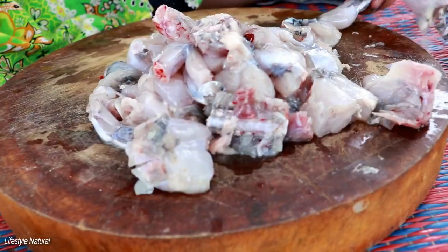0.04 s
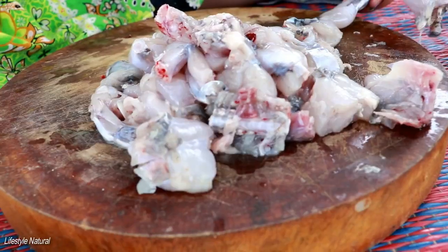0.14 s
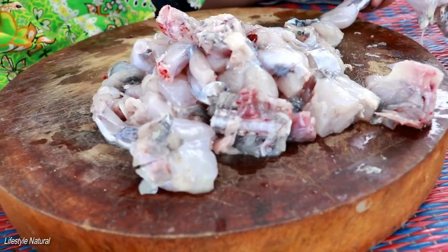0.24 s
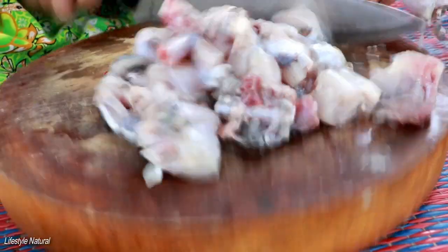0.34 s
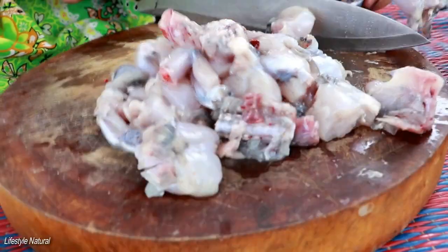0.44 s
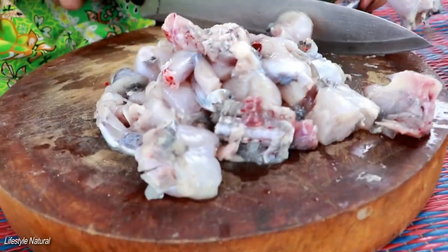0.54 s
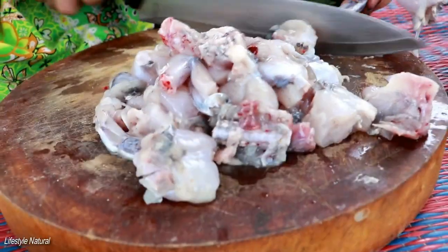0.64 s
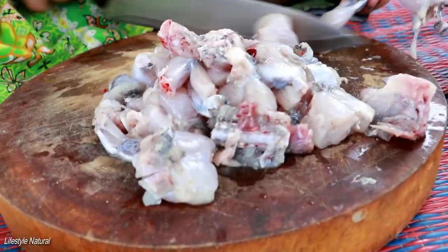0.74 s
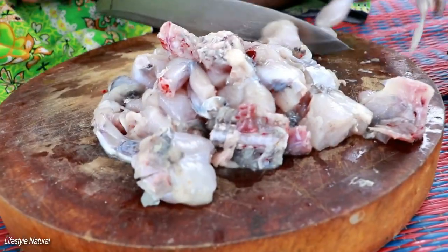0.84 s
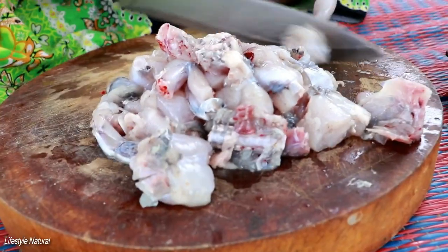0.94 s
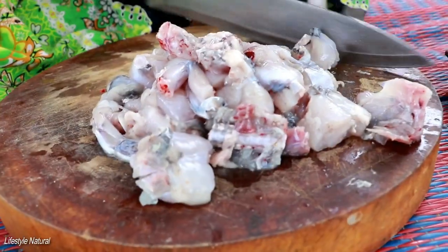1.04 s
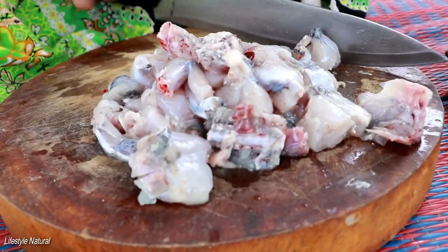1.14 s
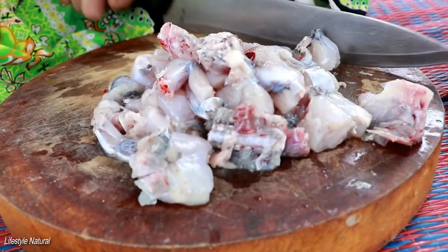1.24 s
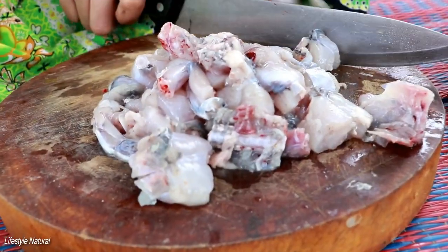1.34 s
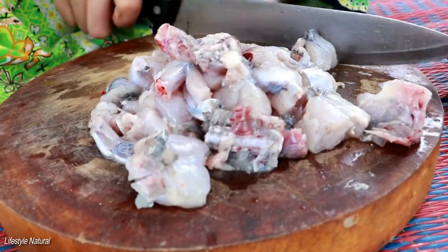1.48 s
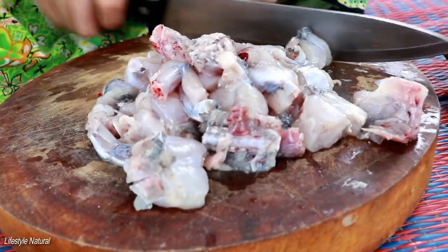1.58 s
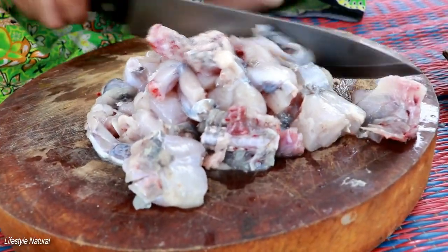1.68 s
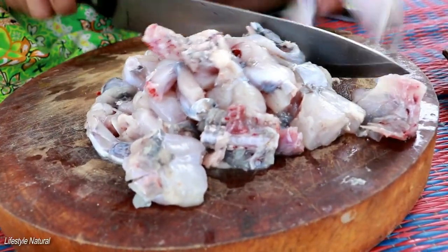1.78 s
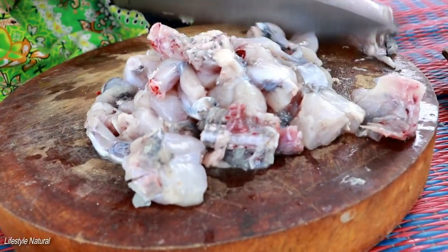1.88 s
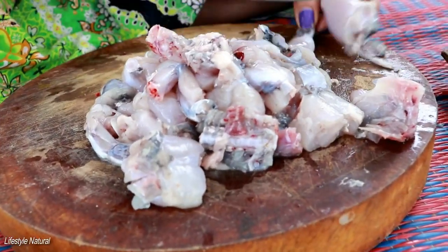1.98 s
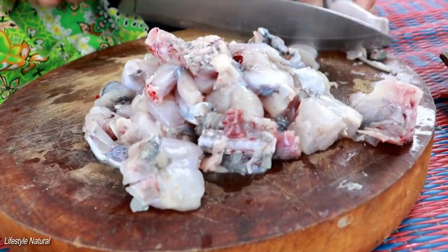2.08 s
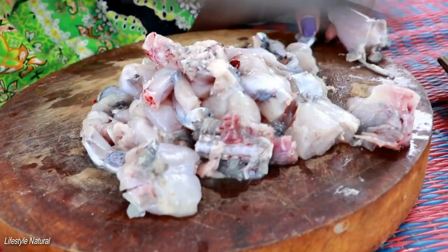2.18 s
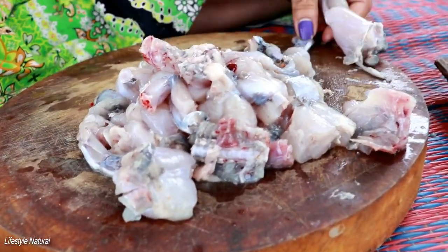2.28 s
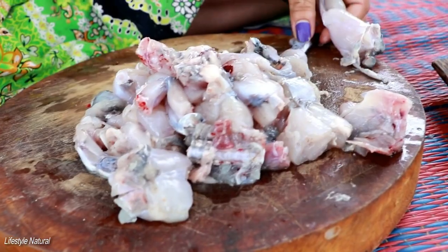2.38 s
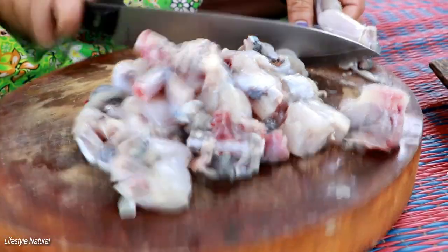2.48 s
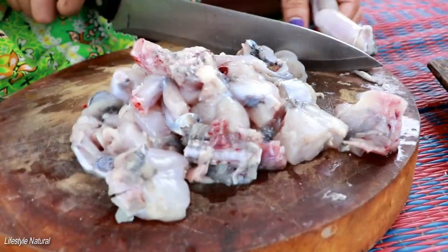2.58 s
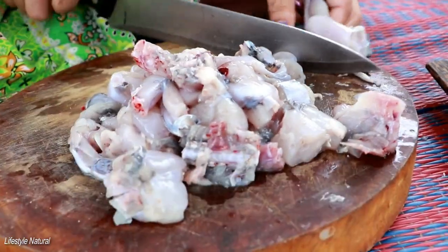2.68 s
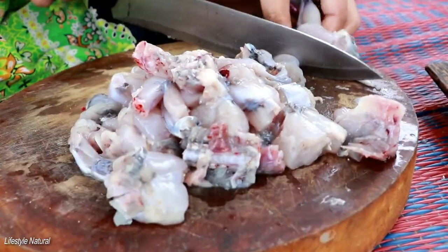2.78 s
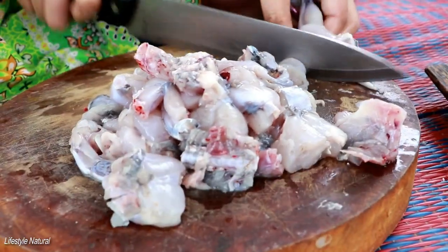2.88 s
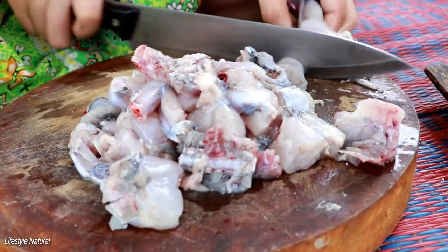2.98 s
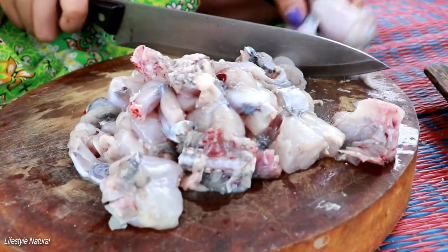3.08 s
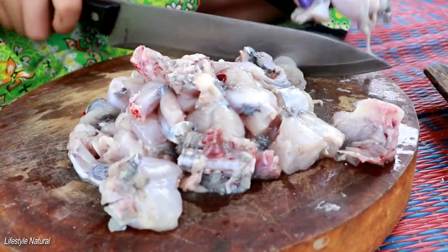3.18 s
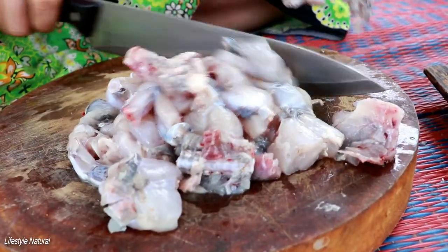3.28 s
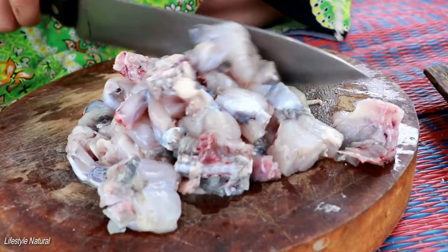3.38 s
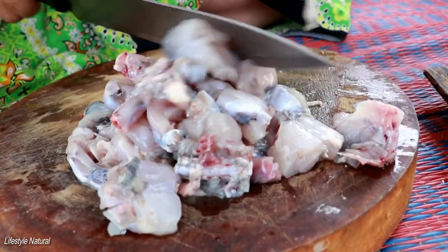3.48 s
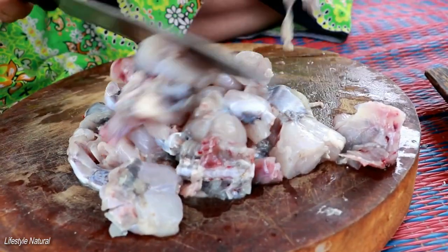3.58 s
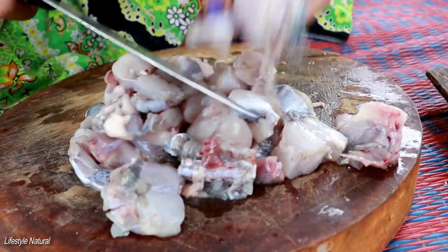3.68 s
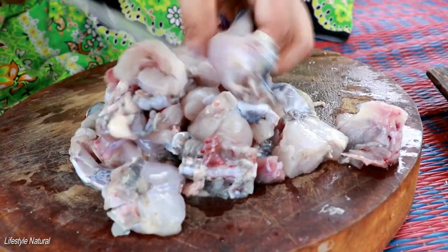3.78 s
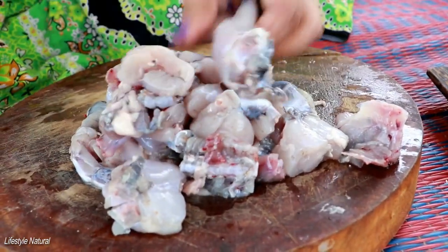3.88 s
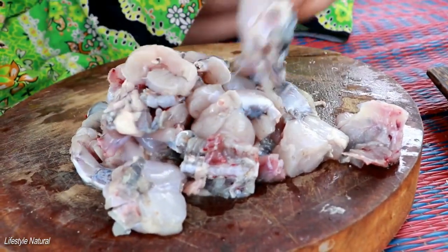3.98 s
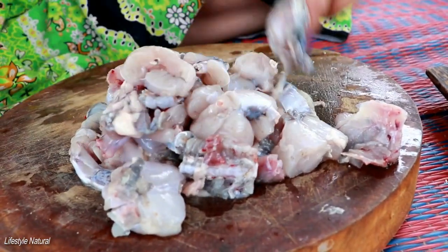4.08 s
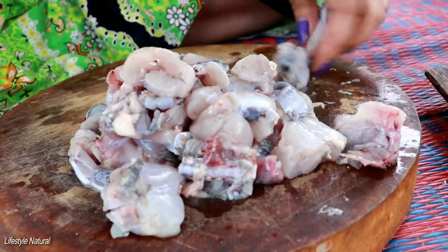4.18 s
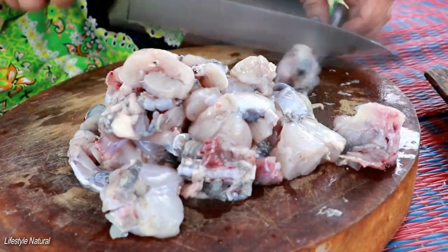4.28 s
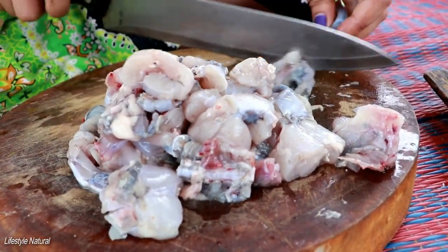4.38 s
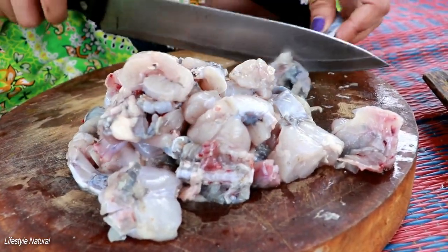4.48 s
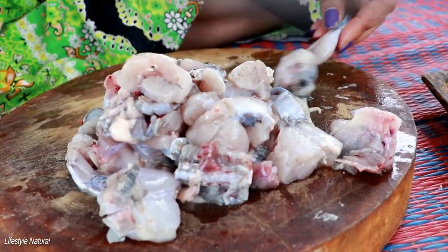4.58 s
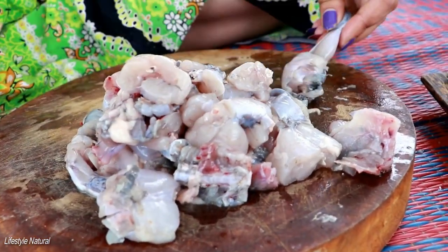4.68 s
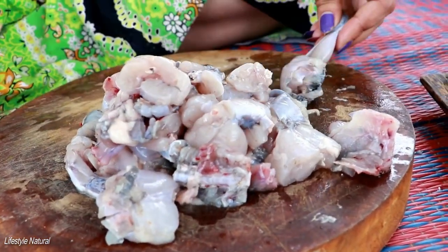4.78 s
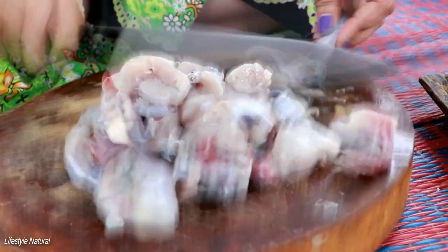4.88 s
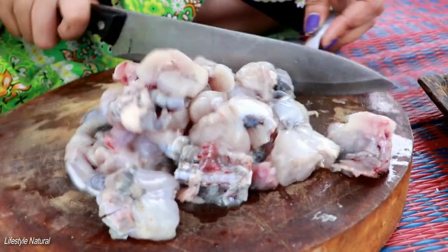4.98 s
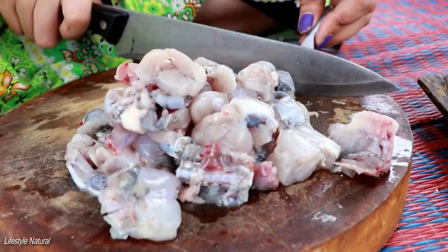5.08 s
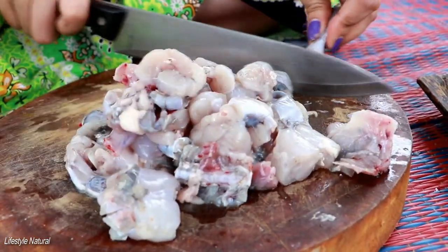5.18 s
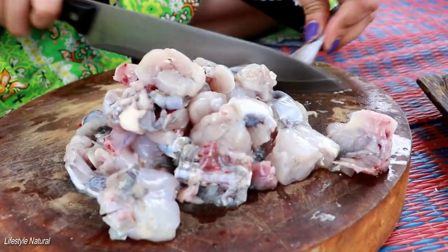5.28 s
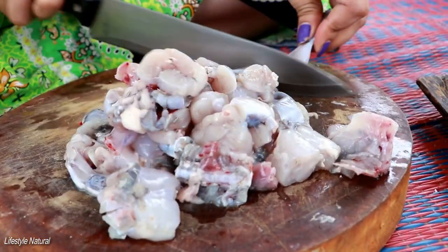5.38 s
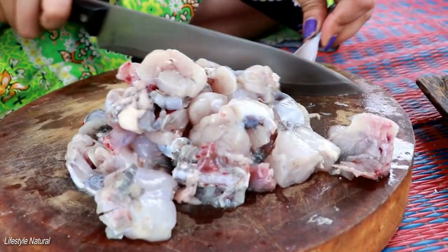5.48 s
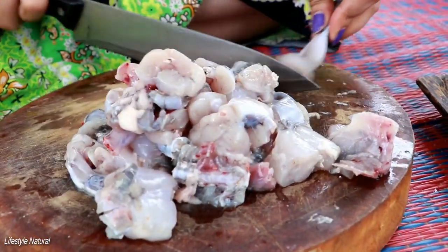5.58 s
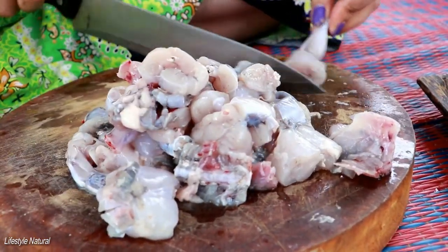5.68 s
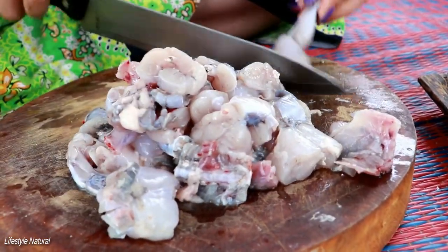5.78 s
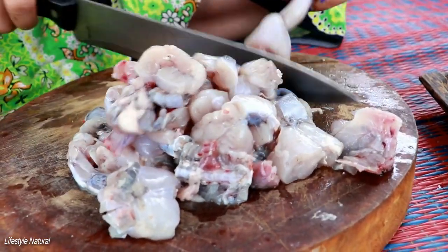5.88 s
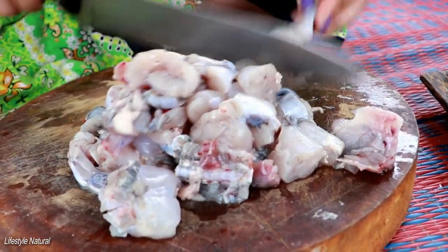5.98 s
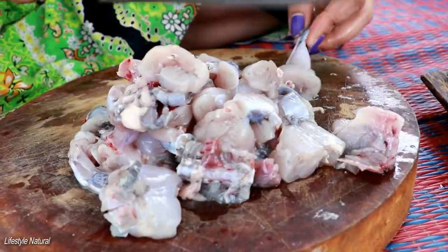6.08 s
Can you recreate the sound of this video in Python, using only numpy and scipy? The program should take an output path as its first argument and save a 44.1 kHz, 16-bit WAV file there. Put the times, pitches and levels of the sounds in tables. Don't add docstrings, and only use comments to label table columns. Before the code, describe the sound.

An outdoor spot with soft air hiss, low rumble and a distant motor droning throughout, quiet beneath a very close chopping board. Tiny bird notes chirp at the start. At 0.4 s a heavy knife slices flesh and cracks bone, the thick board and blade ringing briefly, with wet spatter and three quick bounces; the blow distorts. Another bird note comes at 0.65 s, a faint scrape near 0.8, small wet ticks from 1.05, and a quick birdsong burst around 1.45-1.6. A duller tick falls at 2.15. A cricket starts at 2.4, chop two snaps at 2.5 with two later bounces, and chirping continues to about 3.65, with scrapes near 2.95. The breeze dips around 3.9. Chop three hits at 4.95, woodier, with six clattering bounces, the last heavy. Wet ticks and longer soft scrapes finish by 6 s.

```python
import sys
import numpy as np
from scipy import signal
from scipy.fft import rfft, irfft
from scipy.io import wavfile
from scipy.ndimage import uniform_filter1d

SR = 44100
rng = np.random.default_rng(int(sys.argv[2]) if len(sys.argv) > 2 else 0)


def voltage_ratio(decibels):
    exponent = np.asarray(decibels, float) / 20
    return 10 ** exponent


def output_pcm(signal):
    pcm = np.clip(np.atleast_2d(signal).T, -1, 1) * 32767
    wavfile.write(sys.argv[1], SR, np.round(pcm).astype(np.int16))


N = 270774

# frequency in Hz, level in dB per Hz.
CRACK_SPECTRA = [
    [(1060, -45), (2400, -10), (3860, 2.5), (6340, -13.5), (7930, -6.5), (10900, -26), (13700, -9),
     (15400, -22)],
    [(1060, -49), (1800, -9.5), (3630, 4), (4540, -29.5), (5540, 1.5), (7580, -10.5), (12400, -18),
     (15400, -33)],
    [(1060, -38), (1800, -12), (3660, -4), (4190, -12.5), (5640, -7), (6340, -7.5), (9840, -14.5),
     (15400, -31.5)],
]


def evened(x):
    return x / np.sqrt(np.mean(x ** 2) + 1e-20)


def read(points, hz):
    f, value = np.transpose(points)
    return np.interp(np.log(hz + 1), np.log(f + 1), value)


def add(mix, s, sound):
    part = mix[round(s * SR):][:len(sound)]
    part += sound[:len(part)]


def coloured(points, size):
    hz = np.fft.rfftfreq(size, 1 / SR)
    spectrum = rfft(rng.standard_normal(size)) * voltage_ratio(read(points, hz))
    return evened(irfft(spectrum, size))


def resonate(x, hz, width):
    r = np.exp(-np.pi * width / SR)
    return signal.lfilter([1, 0, -1], [1, -2 * r * np.cos(2 * np.pi * hz / SR), r * r], x)


def resonate_twice(x, hz, width):
    return resonate(resonate(x, hz, width), hz, 2 * width)


def open_air():
    # frequency in Hz, level in dB per Hz.
    air_spectrum = [(20, -15.5), (40, -14.5), (70, -14), (100, -6.5), (273, -8.5), (464, -18), (855, -22),
                    (1400, -26), (2460, -30), (3500, -32), (6000, -37), (10000, -44.5), (15400, -53.5)]
    rumble_rise_db_per_s, gust_db, gust_period_s = 0.4, 0.3, 1.85
    lull_s, lull_length_s, lull_db = 3.9, 0.77, -3
    frames, hz = N // 512 + 5, np.fft.rfftfreq(2048, 1 / SR)
    real, imag, patches = rng.standard_normal((frames, 1025, 3)).T
    patches = evened(uniform_filter1d(uniform_filter1d(patches, 14, 0), 8, 1))
    t = np.arange(frames) * 512 / SR
    low = (1 / (1 + (hz / 500) ** 2))[:, None]
    gust = gust_db * np.cos(2 * np.pi * t / gust_period_s)
    lull_depth_db = lull_db / (1 + (hz[:, None] / 3500) ** 2)
    lull = lull_depth_db * np.exp(-((t - lull_s) / lull_length_s) ** 2)
    swell_db = low * rumble_rise_db_per_s * (t - t.mean()) + (1 - low) * (gust + lull)
    level_db = read(air_spectrum, hz)[:, None] + 1.2 * patches + swell_db
    wash = signal.istft((real + 1j * imag) * voltage_ratio(level_db), nperseg=2048, noverlap=1536)[1][:N]
    return voltage_ratio(-45.5) * evened(wash)


def far_motor():
    # frequency in Hz, width in Hz, rms level in dB.
    motor_lines = [(52.2, 19, -56.5), (96.9, 12.6, -48), (119.2, 5.9, -56), (147.6, 14, -62.5),
                   (191.45, 3.2, -55), (265.3, 33, -58), (682, 66, -64.5), (1065, 62, -62.5),
                   (1804, 280, -65.5), (3600, 690, -67.5)]
    out = np.zeros(N)
    for hz, width_hz, db in motor_lines:
        out += voltage_ratio(db) * evened(resonate_twice(rng.standard_normal(N), hz, width_hz))
    return out


def birds():
    # start in seconds, length in seconds, start pitch in Hz, end pitch in Hz, rms level in dB.
    bird_notes = [(0.019, 0.026, 3820, 4020, -58), (0.037, .016, 3720, 3600, -60),
                  (0.064, .018, 4160, 3800, -60), (.63, 0.032, 2780, 2770, -57),
                  (0.671, .05, 2780, 2760, -65), (1.44, 0.05, 3110, 3060, -61),
                  (1.453, .03, 3900, 4030, -67), (1.53, 0.055, 3400, 3300, -60),
                  (1.472, .008, 3300, 2300, -56), (1.482, 0.014, 3226, 3150, -52),
                  (1.498, 0.029, 3940, 4360, -56), (1.52, 0.043, 4100, 4000, -55),
                  (1.56, 0.0177, 3550, 1700, -51), (1.567, 0.016, 4460, 3740, -55),
                  (1.577, 0.0074, 3350, 2720, -50), (1.583, 0.0094, 2090, 2800, -58),
                  (3.047, .03, 3970, 3950, -61)]
    out = np.zeros(N)
    for s, length_s, start_hz, end_hz, db in bird_notes:
        u = np.arange(0, length_s, 1 / SR) / length_s
        flutter = evened(uniform_filter1d(rng.standard_normal(len(u)), 100))
        turns = np.cumsum(start_hz * (end_hz / start_hz) ** u) / SR
        add(out, s, voltage_ratio(db + 4 + 2.3 * flutter) * np.sin(2 * np.pi * turns) * np.sin(np.pi * u))
    return out


def cricket():
    chirp_starts = [
        2.428,
        2.688,
        2.908,
        3.116,
        3.333,
        3.553,
    ]
    # pulse period in seconds, pitch in Hz, width in Hz, pulse t60 in seconds.
    wing = (.036, 4760, 420, .09)
    period_s, hz, width_hz, t60_s = wing
    t = np.arange(2400) / SR
    envelope = voltage_ratio(-57.5 - 60 * t / t60_s) * np.minimum(t / 0.0023, 1)
    out = np.zeros(N)
    for s in chirp_starts:
        for j in range(3):
            rub = resonate(resonate(rng.standard_normal(len(t)), hz, width_hz), hz, width_hz)
            add(out, s + j * period_s, envelope * evened(rub))
    return out


def scrapes():
    # middle in seconds, length in seconds, rms level in dB, pitch in Hz, width in Hz.
    drags = [
        (0.77, .05, -61.5, 6440, 2310),
        (0.77, 0.062, -64, 8600, 1200),
        (2.93, 0.18, -62, 6310, 500),
        (2.96, 0.052, -56.5, 4770, 1600),
        (4.697, 0.13, -66, 5030, 1483),
        (5.34, .1, -79, 11300, 4000),
        (5.427, 0.33, -63, 4870, 3470),
        (5.63, .07, -84, 10000, 6000),
        (5.752, 0.46, -63.5, 3600, 1200),
    ]
    out, t = np.zeros(N), np.arange(-SR // 4, SR // 4) / SR
    for s, length_s, db, hz, width_hz in drags:
        grit = rng.standard_normal(len(t)) * voltage_ratio(2.5 * np.minimum(rng.exponential(1, len(t)), 4))
        scrape = evened(resonate_twice(grit, hz, width_hz))
        add(out, s + t[0], voltage_ratio(db) * scrape * np.exp(-(2 * t / length_s) ** 2))
    return out


def wet_ticks():
    # time in seconds, peak level in dB, pitch in Hz.
    flesh_snaps = [(1.052, -48, 6500), (1.075, -49, 4710), (1.342, -49, 8500), (1.372, -46, 5510),
                   (1.398, -44.5, 10500), (1.399, -47, 13500), (1.743, -43, 5900), (2.148, -36, 1120),
                   (3.325, -46, 8800), (3.42, -53, 9500), (4.036, -45, 10100), (4.205, -55, 13000),
                   (5.066, -49, 9500), (5.945, -42, 5500), (5.946, -41, 2980)]
    # time in seconds, peak level in dB, pitch in Hz.
    drips = [(.503, -57, 9700), (1.056, -48, 10100), (1.057, -50, 14200), (1.399, -52, 4700),
             (1.914, -51, 8670), (3.294, -54, 8700), (3.627, -51, 6180), (3.811, -51.5, 6650),
             (5.029, -39, 9100), (5.0305, -45, 5930), (5.415, -54, 6400), (5.428, -54, 6500),
             (5.497, -55, 5700), (5.63, -51, 7250), (5.985, -62, 8950)]
    out, t = np.zeros(N), np.arange(600) / SR
    for ticks, width_share in ((flesh_snaps, 0.26), (drips, 0.11)):
        for s, db, hz in ticks:
            crackle = rng.standard_normal(len(t)) ** 3 * np.exp(-t / 0.0034)
            tick = resonate_twice(crackle, hz, width_share * hz)
            add(out, s, voltage_ratio(db) * tick / abs(tick).max())
    return out


def spatter(place):
    # start in seconds, rms level in dB, rise in seconds, t60 in seconds.
    splashes = [
        (.386, -28.5, 0.0043, 0.17),
        (2.535, -30.5, 0.008, 0.16),
        (4.955, -34.5, 0.0028, 0.2),
    ]
    # frequency in Hz, level in dB per Hz.
    splash_spectra = [
        [(300, -19.5), (1000, 5), (2000, -3.5), (2650, -7.5), (2840, -11), (3700, -3), (4320, -10), (7270, -6),
         (7990, -7.5), (11700, -14), (12900, -8), (15400, -25)],
        [(1180, -46), (2000, -11), (2460, -11), (2670, -16), (2990, -6), (3930, -11.5), (4510, -18),
         (5210, -1.5), (6230, -10.5), (8630, -5.5), (9320, -11.5), (15400, -24)],
        [(300, -20), (800, 0), (2000, -5), (2350, -4), (2580, -8), (3200, -3), (4240, -8), (6230, -7),
         (7990, -13), (10100, -14), (15400, -31)],
    ]
    out, t = np.zeros(N), np.arange(SR // 5) / SR
    s, db, rise_s, t60_s = splashes[place]
    grain = voltage_ratio(1.8 * evened(uniform_filter1d(rng.standard_normal(len(t)), 90)))
    envelope = voltage_ratio(db - 60 * t / t60_s) * (1 - np.exp(-t / rise_s))
    add(out, s, envelope * grain * coloured(splash_spectra[place], len(t)))
    return out


def leading_swell(place):
    # start in seconds, length in seconds, rms level at the end in dB, rise in dB.
    swells = [
        (.3775, .0052, -31, 5),
        (2.516, .0064, -24, 20),
        (4.9432, .0046, -30, 14),
    ]
    out, t = np.zeros(N), np.arange(SR // 5) / SR
    s, length_s, db, rise_db = swells[place]
    hiss = voltage_ratio(db + rise_db * (t / length_s - 1)) * coloured(CRACK_SPECTRA[place], len(t))
    add(out, s, hiss[t < length_s])
    return out


def ring(modes, place):
    t, out = np.arange(SR // 5) / SR, 0
    for k, (hz, t60_s, *db) in enumerate(modes):
        out = out + (-1) ** (k // 2) * voltage_ratio(db[place] - 60 * t / t60_s) * np.sin(2 * np.pi * hz * t)
    return out


def impacts(place):
    # mode in Hz, t60 in seconds, level in dB at chops 1, 2 and 3 (another spot each time).
    board_modes = [(140.6, 0.047, -32, -25, -15), (270, 0.016, 4.5, 2.5, -6), (415, .09, -13, -5, -27),
                   (488.5, 0.028, 9.5, 4.5, -1), (587, 0.074, -15.5, -26.5, -10),
                   (799.5, 0.041, 0, -2.5, 11.5), (807.2, 0.053, 1.5, -1, 9.5),
                   (832.4, 0.019, 12.5, 6, 7.5), (982, 0.051, 6, 1, -1.5), (1293, 0.021, 10, 10.5, -1),
                   (1550, 0.018, -2.5, -13.5, -18), (1757, 0.031, -2.5, -11, -8),
                   (2300, 0.017, -4, -12, -6.5), (2770, 0.019, -3, -14, -16.5)]
    # mode in Hz, t60 in seconds, level in dB at chops 1, 2 and 3.
    blade_modes = [(3600, .013, -15, -7, -9), (4900, .013, -18, -22, -15), (5490, .016, -13, -10, -16),
                   (6900, .015, -24, -18, -20), (8700, .022, -17, -26, -26), (10000, .015, -26, -24, -20),
                   (13900, .012, -16, -26, -28)]
    # blow in seconds, lead of the bone snap in ms, bone snap in dB, landing crack in dB.
    blows = [
        (.383, 0.71, -4.5, -2),
        (2.5226, 0.58, -1.5, -4.5),
        (4.9485, 1.2, -12.5, -8),
    ]
    # time in seconds, level in dB, contact in ms.
    bounces = [
        [(.3956, -21.5, 0.098), (.3985, -26, 0.053), (.4025, -19.5, .15)],
        [(2.5488, -30, 0.14), (2.5775, -14, 0.69)],
        [(4.9626, -13, 0.18), (4.9648, -21, 0.054), (4.9665, -14, 0.077), (4.997, -15, .4), (5.0075, -3, 1.2),
         (5.013, -8, 1.4)],
    ]
    blow_contact_ms, landing_delay_s = 0.11, 0.0017
    settle_s, choke_db_per_s = 0.022, 800
    wood, out, t = np.zeros(N), np.zeros(N), np.arange(SR // 5) / SR
    board, blade = ring(board_modes, place), ring(blade_modes, place)
    blow_s, lead_ms, snap_db, landing_db = blows[place]
    pushes = [(blow_s, 0, blow_contact_ms)] + bounces[place]
    cracks = [(blow_s - lead_ms / 1000, snap_db, 0.02), (blow_s + landing_delay_s, landing_db, 0.013)]
    for s, db, contact_ms in bounces[place]:
        cracks.append((s, db - 64 - 40 * np.log10(contact_ms), 0.018))
    for s, db, contact_ms in pushes:
        push = t * np.exp(-t * 2000 / contact_ms)
        add(wood, s, voltage_ratio(db) * signal.fftconvolve(board, push[:400] / push.sum())[:len(t)])
    for s, db, t60_s in cracks:
        burst = voltage_ratio(db - 60 * t / t60_s) * coloured(CRACK_SPECTRA[place], len(t))
        add(out, s, np.minimum(t / 0.00069, 1) * (burst + voltage_ratio(db + 6.5) * blade))
    resting_s = np.clip(np.arange(N) / SR - blow_s - settle_s, 0, 0.025)
    return out + wood * voltage_ratio(-choke_db_per_s * resting_s)


def chop(place):
    out = leading_swell(place) + impacts(place) + spatter(place)
    return signal.lfilter(*signal.butter(2, 60, "highpass", fs=SR), out)


def scene():
    background = open_air() + far_motor() + birds() + cricket()
    handling = scrapes() + wet_ticks()
    return (background + handling + sum(chop(place) for place in range(3)))[None]


def low_pass(x):
    return signal.sosfilt(signal.butter(12, 15800, fs=SR, output="sos"), x)


def record(dry):
    # start in seconds, end in seconds.
    treble_dips = [
        (0.3707, .3774),
        (2.507, 2.516),
    ]
    t = np.arange(N) / SR
    dip = uniform_filter1d(sum(1. * (t > start) * (t < end) for start, end in treble_dips), 40)
    bass = signal.filtfilt(*signal.butter(4, 700, fs=SR), dry)
    clipped = np.clip(dry + dip * (bass - dry), -1.01, 1.01)
    lowpass = signal.firwin(255, 15750, window=("kaiser", 8), fs=SR)[None]
    mix = np.clip(signal.oaconvolve(clipped, lowpass, "same"), -1, 1)
    return low_pass(mix)


dry = scene()
out = record(dry)
output_pcm(out)
```